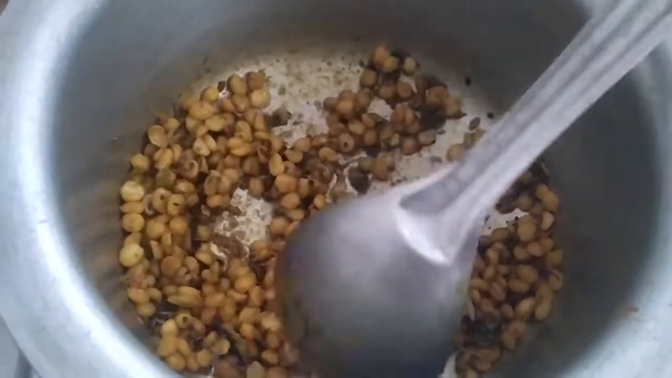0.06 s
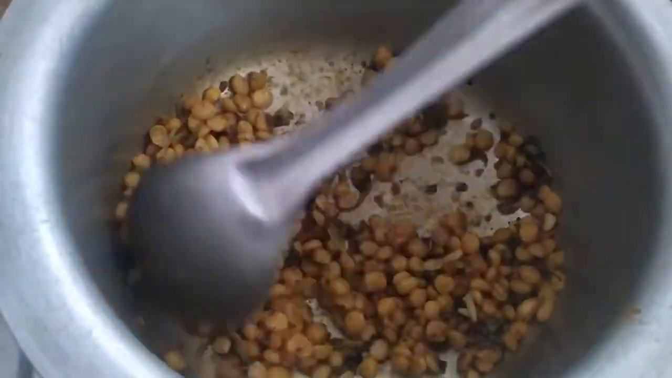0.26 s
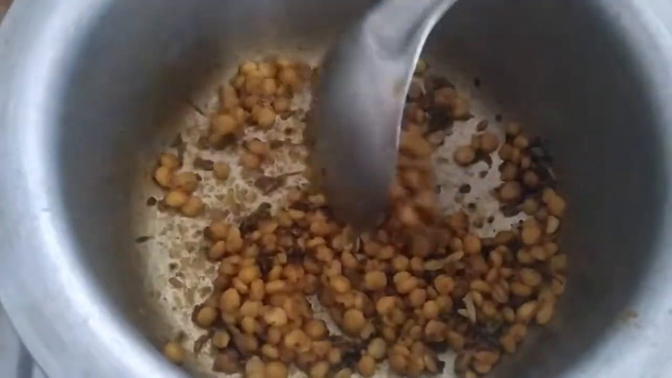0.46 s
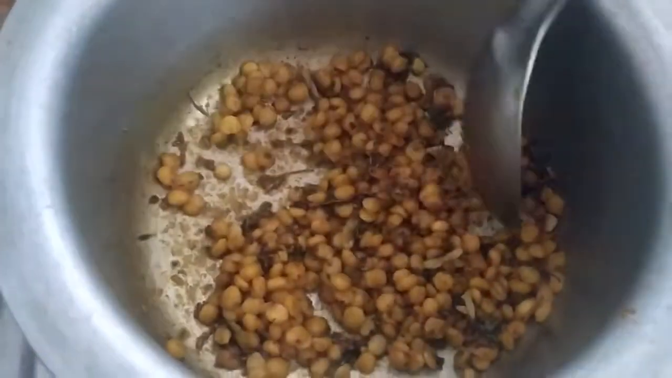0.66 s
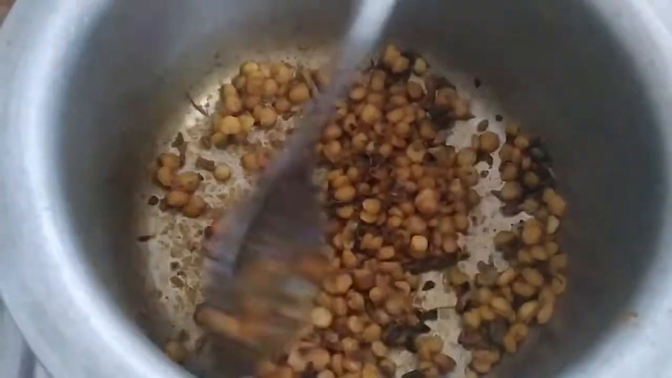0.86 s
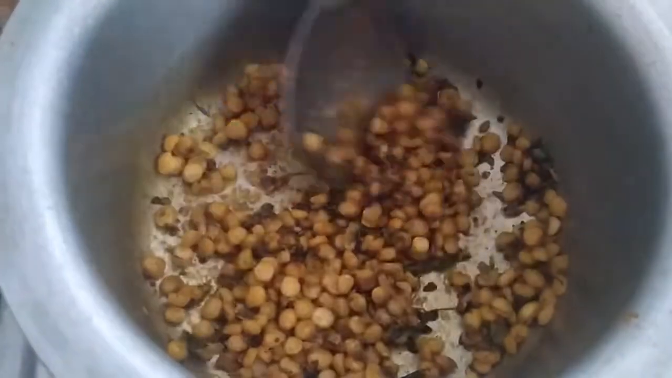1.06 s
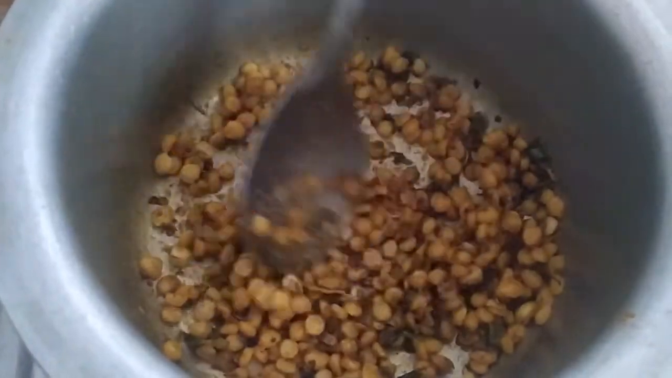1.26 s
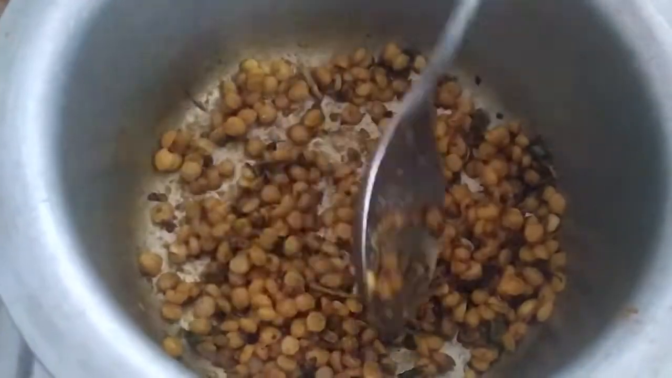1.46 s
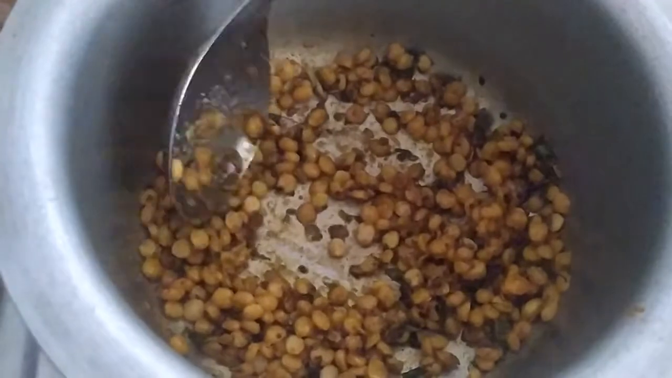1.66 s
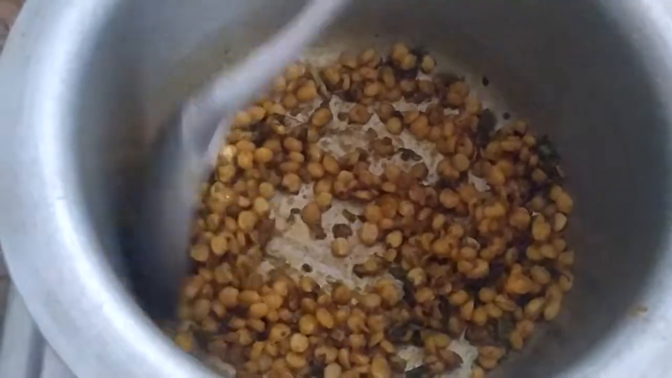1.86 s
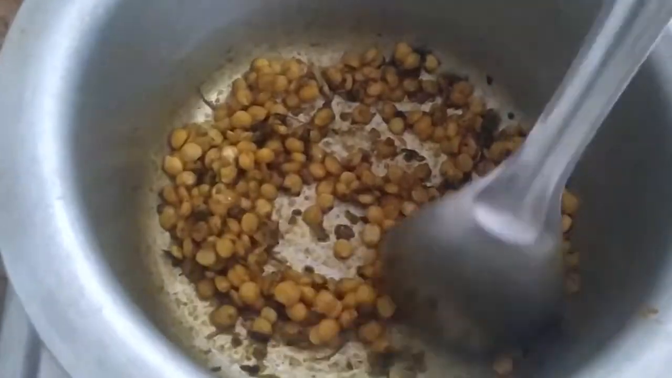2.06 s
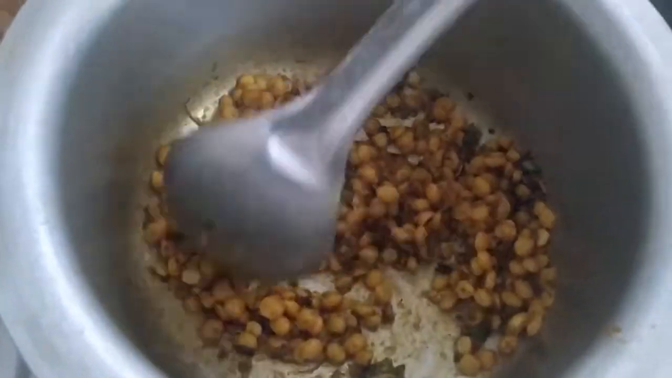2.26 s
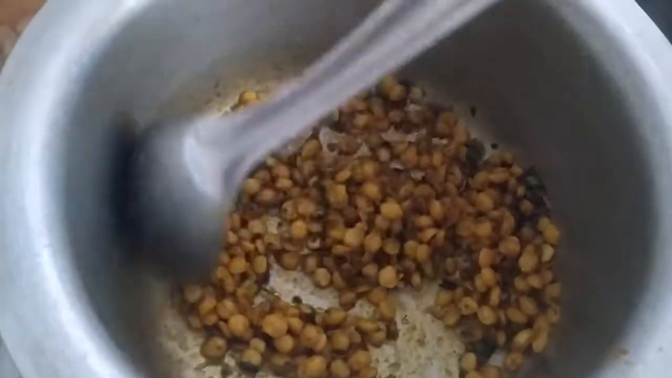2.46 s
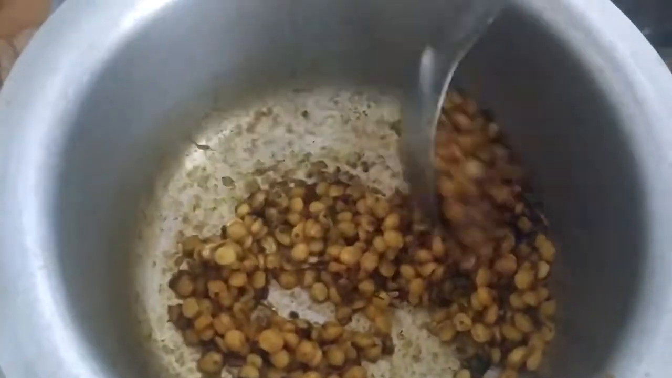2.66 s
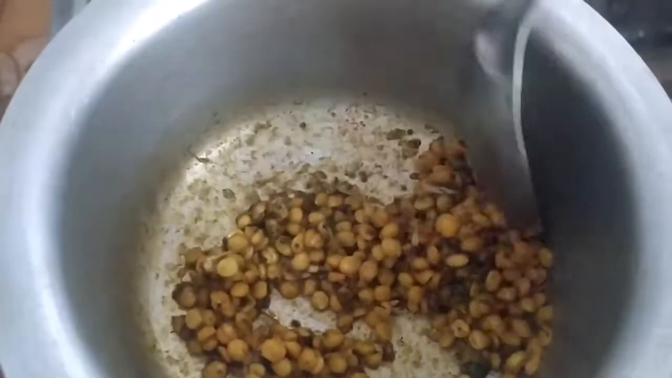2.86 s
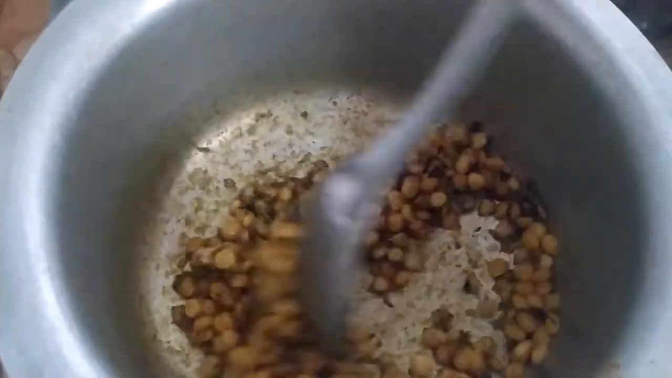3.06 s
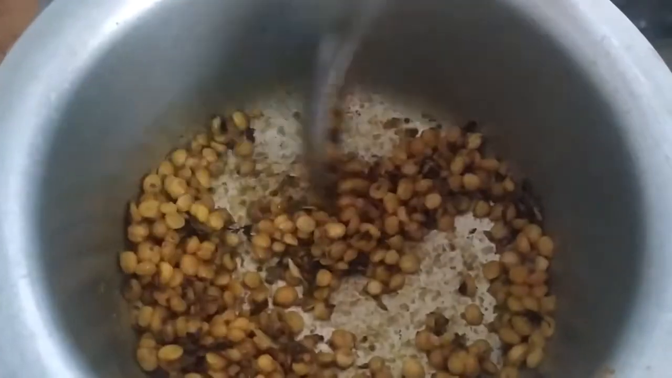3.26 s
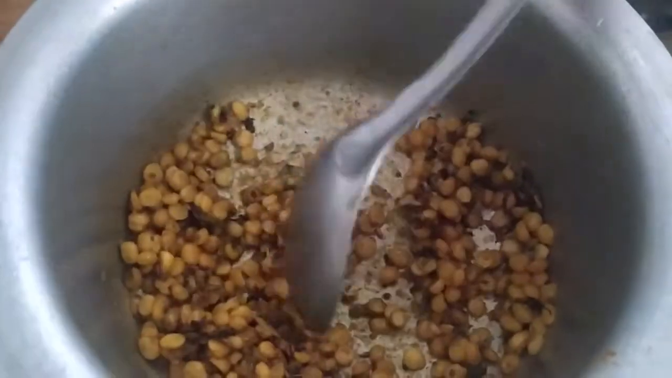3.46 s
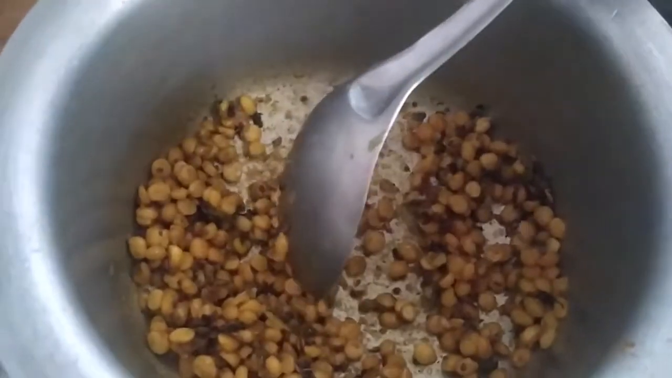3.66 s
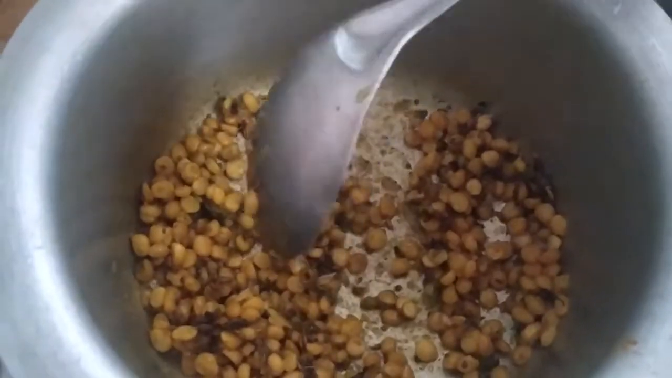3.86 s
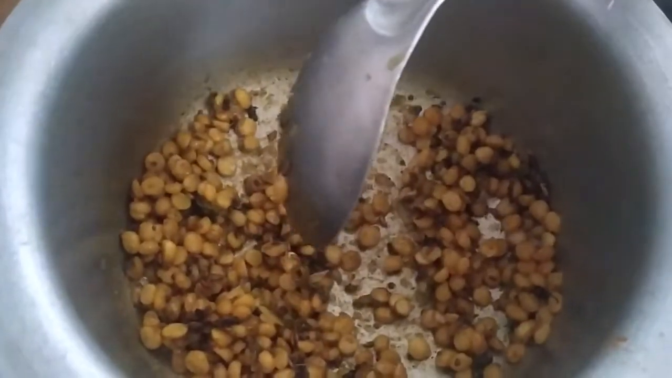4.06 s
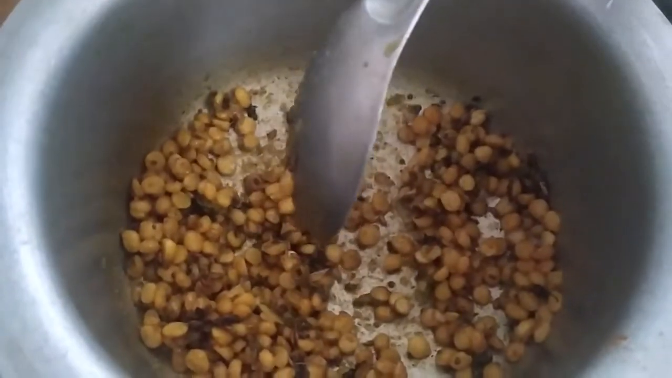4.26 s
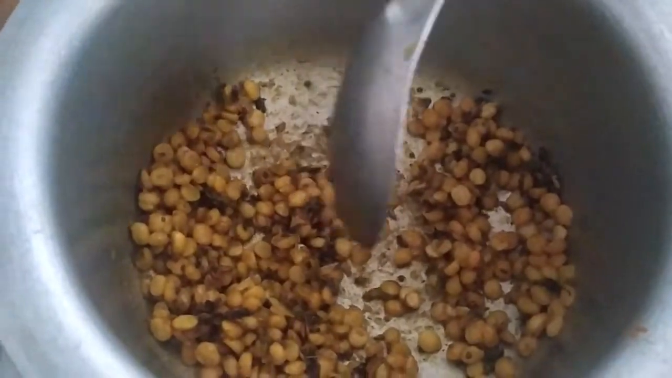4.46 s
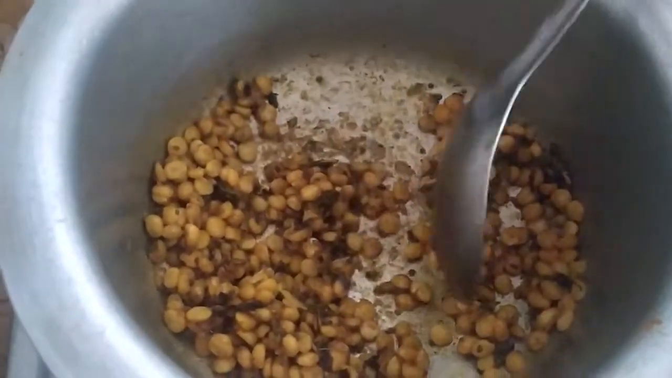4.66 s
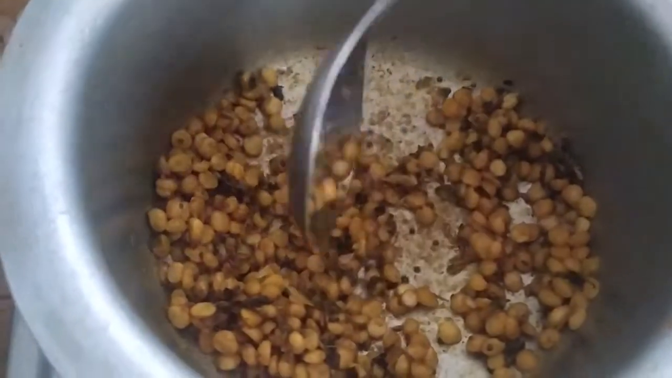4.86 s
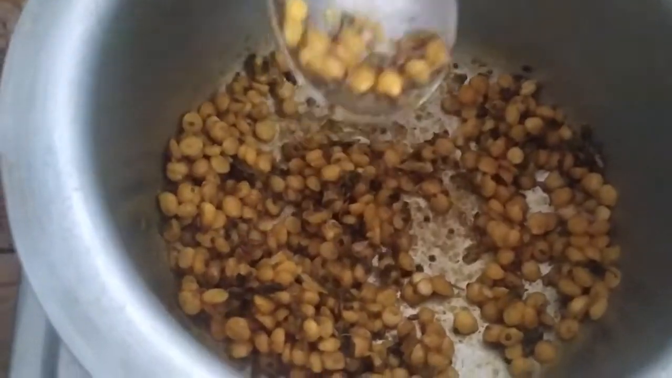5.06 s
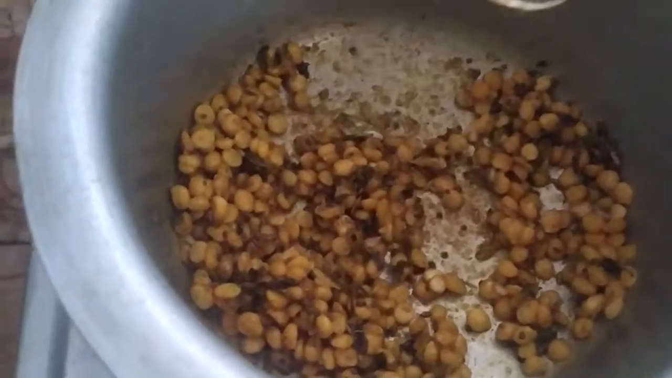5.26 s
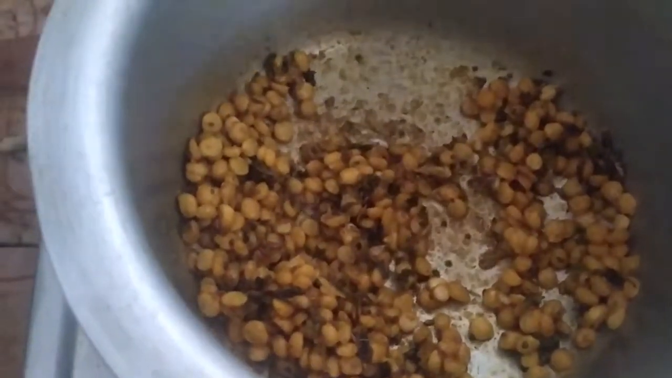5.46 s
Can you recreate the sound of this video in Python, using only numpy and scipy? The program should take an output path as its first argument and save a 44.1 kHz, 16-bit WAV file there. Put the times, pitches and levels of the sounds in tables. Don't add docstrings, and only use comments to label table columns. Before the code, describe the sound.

Close, crisp frying with sharp oil pops, rattling lentils, a ringing spoon clink near three seconds, then a slow smooth scoop scrape.

```python
import sys
import numpy as np
from scipy import signal
from scipy.fft import rfft, irfft
from scipy.io import wavfile
from scipy.ndimage import uniform_filter1d

SR = 44100
rng = np.random.default_rng(int(sys.argv[2]) if len(sys.argv) > 2 else 0)


def int16_out(signal):
    q = np.round(np.clip(np.atleast_2d(signal).T, -1, 1) * 32767)
    wavfile.write(sys.argv[1], SR, q.astype(np.int16))


def linear_from_db(decibels):
    return 10 ** (np.asarray(decibels, float) / 20)


N = 242991

# f/Hz, width/Hz, level/dB
FLOOR_BODY = [(178, 180, -17), (314, 137, -1.5), (425, 160, -3.5), (621, 155, -1.5), (779, 49, -7)]
# f/Hz, t60/s, twin offset/Hz, twin t60/s
WALL = [(736.3, 0.67, 4.5, 1.17), (1713.2, 0.54, -14.7, 0.66), (2207.4, 1.02, 14.8, 0.65),
        (2528.4, 0.91, 4.1, 1.53), (2934.2, 0.48, -11.2, 0.18), (1688.2, 0.2, 44.4, 0.34),
        (4135.6, 0.47, 50.6, 0.23), (4213.0, 0.1, -20.6, 0.13), (2216.3, 0.34, -11.6, 0.29),
        (4504.7, 0.23, 36.8, 0.18), (4918.7, 0.41, -42.3, 0.11), (5799.4, 0.3, 5.5, 0.53),
        (6161.8, 0.26, 53.9, 0.2), (6286.1, 0.26, -25.5, 0.35)]
# t/s, crack level/dB, further pairs' left lag/ms, spoon lifts after/s
CLINKS = [
    (.923, -15.5, .12, 0.0031),
    (2.856, -11.5, -0.08, 0.032),
]


def evened(x):
    return x / np.sqrt(np.mean(x ** 2) + 1e-20)


def curve(rows):
    s, db = np.transpose(rows)
    return np.interp(np.arange(N) / SR, s, db)


def strokes(rows, rise, fall, rest_db):
    t = np.arange(0, N / SR + .01, .001)
    s, hold, db = np.transpose(rows)[:, :, None]
    before, after = np.maximum(s - t, 0), np.maximum(t - s - hold, 0)
    level_db = db - rise * before - fall * after
    return np.interp(np.arange(N) / SR, t, np.maximum(level_db.max(axis=0), rest_db))


def add(mix, s, sound):
    part = mix[:, round(s * SR):][:, :sound.shape[1]]
    part += sound[:, :part.shape[1]]


def coloured(x, points):
    hz, db = np.transpose(points)
    log_f = np.log(np.fft.rfftfreq(N, 1 / SR) + 1)
    gain = linear_from_db(np.interp(log_f, np.log(hz), db))
    return evened(irfft(rfft(x) * gain, N))


def ring(x, hz, width):
    r = np.exp(-np.pi * width / SR)
    c = r * np.cos(2 * np.pi * hz / SR)
    return signal.lfilter([2 * (1 - r), -2 * (1 - r) * c], [1, -2 * c, r * r], x)


def body(x, peaks):
    total = 0
    for hz, width, db in peaks:
        once = ring(x, hz, 1.05 * width)
        total = total + linear_from_db(db) * ring(once, hz, 1.05 * width)
    return evened(total)


def partial(t, hz, t60, left_db, right_db, lag_ms):
    late = t - np.array([[lag_ms / 1000], [0]])
    return linear_from_db(np.array([[left_db], [right_db]]) - 60 * t / t60) * np.exp(2j * np.pi * hz * late)


def ports(per_s, spread_db, lag_ms, scatter_ms, diffuse, pitches):
    clicks = rng.choice([-1., 1.], (3, N)) * (rng.random((3, N)) < per_s / SR)
    clicks *= linear_from_db(spread_db * np.minimum(rng.exponential(1, (3, N)), 5))
    lag = (lag_ms + scatter_ms * rng.standard_normal(N)) * SR / 1000
    at_left = np.clip(np.arange(N) + np.rint(lag).astype(int), 0, N - 1)
    kind = rng.integers(0, len(pitches), (3, N))
    out = 0
    for k, (hz, width, db) in enumerate(pitches):
        some = clicks * (kind == k)
        direct = np.array([np.bincount(at_left, some[0], N), some[0]])
        both = np.sqrt(1 - diffuse) * direct + np.sqrt(diffuse) * some[1:]
        out = out + linear_from_db(db) * ring(both, hz, width)
    return evened(out)


def kitchen():
    # f/Hz, level/dB per Hz
    air_colour = [(15, -40), (40, 5), (65, -3), (105, 1), (175, 3), (230, -29), (560, 4), (1070, -13.5),
                  (1600, -21), (6000, -75)]
    # t/s, level/dB
    drone_db = [(0.0, -38), (0.11, -62), (0.38, -57), (0.5, -64.5), (0.98, -57), (1.3, -67), (1.75, -64),
                (1.86, -57), (2.15, -55), (2.33, -71), (2.44, -49), (2.9, -66), (3.25, -55.5), (3.61, -71),
                (3.93, -62), (4.36, -64), (4.96, -55.5), (5.51, -47)]
    # t/s, hold/s, level/dB
    murmurs = [(0, .01, -54), (.24, .14, -60), (.95, 0.028, -53.5), (1.55, .01, -58.5), (1.84, 0.32, -55.5),
               (2.42, 0.25, -59), (2.98, .01, -60), (3.18, 0.26, -54.5), (4.56, 0.017, -60),
               (4.84, 0.034, -51.5), (5.27, 0.021, -50.5)]
    noise = rng.standard_normal((3, 3, N))
    air, low, lump = (evened(n[0] + .38 * n[1:]) for n in noise)
    drone = body(low, [(70.7, 8.2, 11), (78.7, 54, -10.0)]) * linear_from_db(curve(drone_db))
    murmur = body(lump, [(166.8, 16.4, 2.5), (121.0, 113, -3.0)])
    murmur = murmur * linear_from_db(strokes(murmurs, rise=103, fall=116, rest_db=-68))
    return coloured(air, air_colour) * linear_from_db(-61.0) + drone + murmur


def scoop():
    # t/s, hold/s, level/dB
    pushes = [
        (4.38, .18, -50.5),
        (4.57, 0.17, -41),
        (4.76, 0.19, -41.5),
        (5.0, 0.2, -42.5),
        (5.2, 0.044, -40),
    ]
    # f/Hz, width/Hz, level/dB
    bare_floor = [(437, 166, -3), (716, 160, -9.5), (1040, 240, -7), (1640, 39, -18)]
    drag = ports(per_s=6000, spread_db=1, lag_ms=0.21, scatter_ms=0.074, diffuse=0.36,
                 pitches=[(990, 31000, 0)])
    hiss = body(drag, [(514, 330, -30), (1680, 2860, -3)])
    sound = body(drag, bare_floor) + linear_from_db(7.0) * hiss
    return evened(sound) * linear_from_db(strokes(pushes, rise=200, fall=92, rest_db=-96))


def spits():
    # t/s, peak level/dB, f/Hz, left-right/dB, t60/ms
    pops = [(0.171, -17, 7940, -12, 16), (0.5064, -16, 7350, -12, 16), (0.7115, -16.5, 3260, 10, 9.1),
            (0.9236, -12, 6700, -14, 16), (1.951, -19, 10500, 0.0, 16), (2.0193, -16, 6900, -5, 16),
            (2.126, -24, 3250, 2, 8.8), (2.411, -14, 6600, 0.5, 8), (2.415, -15, 4570, 0, 8),
            (2.539, -17, 4330, 2, 7), (2.584, -12, 4100, 2, 8), (2.766, -21, 5420, 4, 8),
            (2.8566, -3.5, 6070, -9, 19), (3.2385, -14, 9100, -7, 15), (3.264, -19, 3300, 2, 7.1),
            (3.276, -19, 3000, 0, 7.3), (3.332, -19, 2710, 6, 15), (3.54, -26, 3970, 1, 8),
            (3.9055, -20, 8100, -1.5, 10), (4.379, -20, 9700, 0.5, 16), (4.932, -24, 5820, 0, 8)]
    out, t = np.zeros((2, N)), np.arange(900) / SR
    for s, db, hz, pan_db, t60_ms in pops:
        pop = np.sin(2 * np.pi * hz * t) * linear_from_db(-60 * t / t60_ms * 1000)
        pop = pop + 0.12 * rng.standard_normal(900) * linear_from_db(-60 * t / 0.0045)
        left = np.roll(pop, 13) * linear_from_db(pan_db / 2)
        add(out, s, linear_from_db(db - 6) * np.array([left, pop * linear_from_db(-pan_db / 2)]))
    return out


def knocks():
    # t/s, peak level/dB, thud f/Hz, tick relative level/dB, wall hum relative level/dB
    hits = [(0.256, -20, 593, -11, -10), (0.365, -27, 595, -8, -8), (0.71, -19.5, 554, -10, -14.5),
            (1.51, -46, 576, -10, -23), (1.855, -37.5, 696, -1, 6), (1.95, -26, 640, -17, -3.5),
            (1.994, -30, 580, -18, 0), (2.123, -31.5, 584, -5, -20), (2.426, -8, 616, -10.5, -14.5),
            (2.536, -17.5, 617, -18, -41), (3.169, -25, 516, -13, -36), (3.331, -34.5, 477, -17, -30),
            (4.566, -36, 425, -21, -11)]
    out, t = np.zeros((2, N)), np.arange(SR // 3) / SR
    late = np.maximum(t - np.array([[.0016], [.0014]]), 0)
    hum_hz = WALL[0][0] + WALL[0][2]
    for s, db, hz, tick_db, wall_db in hits:
        push = (1 - np.exp(-(late / 0.00093) ** 2)) * np.exp(-late / 0.0031) * 1.27
        thud = -np.sin(2 * np.pi * hz * late) * push
        give = late / 0.0041 * np.exp(1 - late / 0.0024)
        thud = thud - 0.22 * np.sin(2 * np.pi * 0.436 * hz * late) * give
        jumps = rng.standard_normal((3, len(t)))
        tail = body(jumps[0] + .5 * jumps[1:], FLOOR_BODY)
        tail = tail * linear_from_db(-18.5 - 60 * t / 0.32) * (1 - np.exp(-late / 0.004))
        tick = ring(jumps[1:], 2300, 3200) * linear_from_db(tick_db - 60 * t / 0.13) * (late > 0)
        hum = np.sin(2 * np.pi * hum_hz * late) * linear_from_db(wall_db - 60 * t / 0.53)
        hum = hum * (1 - np.exp(-t / 0.11)) * linear_from_db([[2.5], [-2.5]])
        add(out, s, linear_from_db(db + 2.0) * (thud + tail + tick + hum))
    return out


def clang(t):
    draw = rng.random((40, 4, 2, 1))
    hz, t60 = 2600 * 3.7 ** draw[:, 0], 0.038 + 0.064 * draw[:, 1]
    level = linear_from_db(-12 * draw[:, 2] - 60 * t / t60)
    return (level * np.sin(2 * np.pi * (hz * t + draw[:, 3]))).sum(axis=0)


def wall_ring(which, lag_ms, lift_s, t):
    # left/dB, right/dB, twin left/dB, twin right/dB, first swell t/s
    first_clink = [(-39.2, -46.1, -30.4, -36.3, 0.1836), (-38.7, -25.6, -20.7, -20.2, 0.0171),
                   (-25.9, -35.1, -43.6, -33.4, 0.0113), (-37.1, -45.6, -46.3, -41.9, 0.0313),
                   (-51.8, -47.4, -34.7, -38.6, 0.0651), (-19.9, -28.4, -45.4, -41.8, 0.0105),
                   (-36.6, -40.3, -46.1, -45.3, 0.0019), (-43.4, -49.7, -35.9, -41.1, 0.0148),
                   (-26.5, -37.5, -21.8, -46.0, 0.0117), (-31.8, -49.3, -26.9, -37.5, 0.0206),
                   (-30.5, -44.0, -20.1, -26.2, 0.0183), (-27.0, -36.6, -40.1, -44.5, 0.0105),
                   (-31.7, -46.0, -46.9, -36.9, 0.0042), (-37.6, -51.6, -41.6, -38.0, 0.0054)]
    second_clink = [(-25.9, -25.3, -22.8, -28.1, 0.1647), (-15.5, -16.9, -22.3, -35.4, 0.0559),
                    (-26.0, -24.7, -24.3, -23.4, 0.0442), (-24.0, -28.8, -39.7, -44.4, 0.0551),
                    (-23.0, -35.9, -24.1, -33.9, 0.0642), (-22.2, -25.6, -27.5, -33.4, 0.0029),
                    (-26.0, -33.0, -21.0, -27.0, 0.0228), (-12.5, -20.0, -11.0, -21.0, 0.0235),
                    (-17.4, -35.4, -15.6, -21.3, 0.0422), (-24.0, -30.0, -27.0, -26.0, 0.0179),
                    (-21.0, -40.0, -23.0, -33.8, 0.036), (-31.2, -32.8, -29.4, -36.6, 0.0706),
                    (-35.5, -34.9, -26.6, -28.4, 0.0094), (-26.3, -30.5, -34.8, -41.7, 0.0155)]
    # left lag/ms, twin left lag/ms in clink one, the same two in clink two
    facing = [(0.265, -0.056, -0.053, -0.096), (0.137, 0.252, 0.02, 0.076), (-0.09, 0.127, -0.097, 0.094),
              (-0.041, 0.034, -0.079, -0.077), (0.046, -0.008, 0.049, 0.101),
              (0.247, -0.205, -0.214, -0.034), (0.005, 0.105, 0.075, 0.031), (0.036, 0.101, -0.043, -0.043),
              (0.034, -0.209, -0.212, 0.156), (0.11, 0.049, -0.004, -0.081), (0.078, 0.084, 0.012, 0.074),
              (0.028, 0.025, -0.026, 0.0), (0.029, 0.063, -0.05, -0.08), (-0.006, -0.055, 0.019, -0.041)]
    neighbours = {5: (1, .0371, .0375), 8: (2, .0878, .0498)}
    # f/Hz, t60/s, twin offset/Hz, level/dB in clink one, level/dB in clink two
    further_pairs = [(6720, 0.17, 52, -20.5, -18), (7860, 0.15, -19, -20.5, -29), (9100, .17, 21, -24, -39),
                     (3440, .5, -10, -36, -30), (4357, 0.3, -22, -42, -16.5), (8440, 0.08, 34, -35, -34),
                     (5250, 0.14, 40, -25, -31), (10000, 0.12, 49, -24, -17)]
    out = 0
    struck = (first_clink, second_clink)[which]
    for k, ((hz, t60, offset_hz, twin_t60), (*db, swell)) in enumerate(zip(WALL, struck)):
        main_ms, twin_ms = facing[k][2 * which:][:2]
        beat = np.exp(2j * np.pi * offset_hz * (t - swell))
        pair = partial(t, hz, t60, *db[:2], main_ms)
        pair = pair + beat * partial(t, hz, twin_t60, *db[2:], twin_ms)
        strong, *step_s = neighbours.get(k, (k, 0, 0))
        pair = pair * np.exp(-2j * np.pi * (hz - WALL[strong][0]) * step_s[which])
        pair = pair * linear_from_db(1.5 + 1.65 * (hz > 2400))
        held = np.array([[.8], [.45]]) * (hz < 2000) * np.exp(-(t / lift_s * (hz / 1713) ** .6) ** 4)
        muffle_s = .26 + .14 * (WALL[0][0] / hz) ** 2
        out = out + pair * (1 - held) * np.exp(-(t / muffle_s) ** 4)
    for hz, t60, offset_hz, *db in further_pairs:
        out = out + partial(t, hz, t60, db[which] - 4, db[which], lag_ms)
        out = out + partial(t, hz + offset_hz, t60, db[which] - 3, db[which] - 8, -lag_ms)
    return out.imag * (1 - np.exp(-t / 0.0012))


def clinks():
    # t/s, length/s, f/Hz, level/dB
    brushes = [
        (1.85, 0.055, 2510, -35.5),
        (1.887, 0.035, 1705, -35.5),
        (1.949, 0.079, 2212, -27),
        (1.959, 0.06, 1715, -40),
        (1.964, 0.2, 4370, -29.5),
        (2.437, 0.031, 2200, -29),
        (2.583, .06, 9100, -21),
    ]
    out, t = np.zeros((2, N)), np.arange(SR // 2) / SR
    soon = t[:SR // 5]
    steel = signal.butter(3, [1000 / SR * 2, 13000 / SR * 2], "bandpass")
    for which, (s, crack_db, lag_ms, lift_s) in enumerate(CLINKS):
        crack = evened(signal.lfilter(*steel, rng.standard_normal((2, len(t)))))
        fade = linear_from_db(-60 * t / 0.023) + 0.28 * linear_from_db(-60 * t / 0.25)
        crack *= linear_from_db(crack_db) * fade * (1 - np.exp(-t / 0.00079))
        add(out, s, linear_from_db(crack_db - 41) * clang(soon) * (1 - np.exp(-soon / 0.0011)))
        add(out, s, crack + wall_ring(which, lag_ms, lift_s, t))
    for s, length, hz, db in brushes:
        swell = t / length * np.exp(1 - 3.4 * t / length) * 2.13
        add(out, s, swell * partial(t, hz, 0.75, db, db - 8.5, 0.022).imag)
    return out


def scuffs(slips):
    # t/s, length/s, level/dB, f/Hz, width/Hz
    grinds = [(0.612, .04, -39.5, 1600, 1100), (.718, 0.069, -44, 3300, 900),
              (0.783, 0.061, -44, 4100, 800), (1.86, .03, -48, 4400, 500), (2.01, 0.049, -38, 4500, 600),
              (2.114, .05, -44, 2750, 700), (2.162, 0.013, -36.5, 2200, 2500),
              (2.416, .04, -32, 7500, 5000), (2.436, 0.059, -39, 2600, 1500),
              (2.568, 0.084, -38.5, 3300, 1600), (2.873, .06, -29, 4370, 400),
              (3.235, 0.05, -39.5, 3330, 1300), (3.332, .06, -48, 2800, 700),
              (3.334, 0.044, -43, 3680, 500)]
    out = np.zeros((2, N))
    for s, length, db, hz, width in grinds:
        grit = slips[:, round(s * SR):][:, :round(length * 1.5 * SR)]
        u = np.arange(grit.shape[1]) / SR / length
        grit = evened(ring(ring(grit, hz, width), hz, width))
        add(out, s, grit * linear_from_db(db) * np.minimum(u / 0.072, 1) * np.exp(-u ** 4))
    return out


def stir():
    # t/s, hold/s, pressure level/dB, steel rasp relative level/dB
    drags = [(0, 0.023, -46.5, -5), (0.126, 0.13, -52, -8), (0.266, 0.0043, -41.5, -1),
             (0.357, .005, -46, -14), (0.623, 0.014, -66, 15), (0.75, .01, -42.5, -2),
             (0.937, 0.012, -43, -13), (0.99, 0.082, -55, 6), (1.527, 0.038, -50, 0.5),
             (1.852, 0.1, -43.5, -5.5), (1.957, 0.025, -40, 1), (2.022, 0.13, -42.5, -6),
             (2.197, 0.13, -54.5, -14), (2.43, 0.12, -37.5, -1.5), (2.576, 0.044, -40, -7),
             (2.88, 0.0084, -50, 14.5), (2.933, 0.033, -55, 7), (3.17, 0.0046, -37, -10),
             (3.218, 0.13, -46, -8), (3.4, 0.17, -55.5, -2), (3.855, .005, -53, -1), (4.206, 0.1, -57.5, 8)]
    # t/s, hold/s, level/dB
    tumbles = [(0, 0.005, -29), (.28, .01, -36), (.37, 0.061, -36), (.62, 0.061, -35.5), (.71, 0.055, -36),
               (.93, .01, -49), (1.1, 0.17, -37), (1.4, .01, -39), (1.74, .01, -41), (1.83, 0.4, -38),
               (2.405, .02, -37), (2.44, .02, -26.5), (2.59, 0.022, -26.5), (2.9, .01, -26.5),
               (2.98, .03, -30.5), (3.25, 0.016, -30.5), (3.33, 0.063, -33), (3.64, .01, -51),
               (3.85, 0.68, -40)]
    slips = ports(per_s=1200, spread_db=3.0, lag_ms=0.27, scatter_ms=0.03, diffuse=0.27,
                  pitches=[(1530, 6300, 0)])
    press_db = strokes([row[:3] for row in drags], rise=1060, fall=166, rest_db=-63)
    rasp_rows = [(s - .01, hold, db + rel) for s, hold, db, rel in drags]
    rasp_db = strokes(rasp_rows, rise=1060, fall=166, rest_db=-56)
    rumble = body(slips, FLOOR_BODY) * linear_from_db(press_db - 2.0)
    rasp = body(slips, [(1530, 470, 13.0), (1930, 1960, -3.0)]) * linear_from_db(rasp_db - 1)

    shells = [(2647, 180, -1), (3640, 530, -3.5), (4400, 1300, -29.5), (7250, 2600, -4.5)]
    rattle = ports(per_s=1600, spread_db=1.5, lag_ms=0.25, scatter_ms=0.092, diffuse=1.0, pitches=shells)
    rattle *= linear_from_db(strokes(tumbles, rise=204, fall=150, rest_db=-44) - 4.5)

    since = np.arange(N) / SR - np.array([[row[0]] for row in CLINKS])
    near = 1 - ((since > -.08) & (since < .3)).sum(axis=0)
    feed = slips * linear_from_db(press_db) * near
    wall = sum(ring(feed, hz, 6.1) for hz, *_ in WALL[:5]) * linear_from_db(19.0)
    return rumble + rasp + rattle + wall + scuffs(slips)


def patchy(x, depth_db):
    z = signal.stft(x, nperseg=256)[2]
    islands = uniform_filter1d(rng.standard_normal(z.shape[1:]), size=3, axis=0)
    islands = evened(uniform_filter1d(islands, size=14, axis=1))
    return evened(signal.istft(z * linear_from_db(depth_db * islands), nperseg=256)[1][:, :N])


def sizzle():
    # t/s, level/dB
    frying_db = [(0.0, -36), (0.49, -33.5), (0.9, -33), (1.0, -30.5), (1.35, -33), (1.56, -31.5),
                 (1.67, -33), (1.93, -34), (1.96, -30.5), (2.39, -34.5), (2.52, -30.5), (2.73, -34),
                 (2.85, -33.5), (2.93, -31.5), (4.26, -37), (5.0, -38), (5.25, -37.5), (5.45, -38.5)]
    # f/Hz, level/dB per Hz
    fizz_colour = [(530, -22), (900, -14.5), (1100, -16.5), (1230, -21), (1420, -14.5), (3370, -7),
                   (3700, -6), (7880, 1.5), (11600, 0), (15800, -9.5)]
    # t/s, hold/s, level/dB
    flares = [
        (.77, 0.031, -33.5),
        (.93, .005, -27),
        (2.42, .02, -30),
        (2.585, 0.022, -30.5),
        (2.87, 0.0071, -24.5),
        (4.37, 0.017, -45.5),
    ]
    sizes = [(2500, 3000, 0), (5500, 4000, 0), (9000, 5000, 0), (13500, 6000, 0)]
    bursts = ports(per_s=7000, spread_db=2.0, lag_ms=.32, scatter_ms=.02, diffuse=0.069, pitches=sizes)
    t = np.arange(1500) / SR
    wash = rng.standard_normal((2, 1500)) * linear_from_db(-60 * t / 0.053) * linear_from_db(-7.0)
    wash[:, 0] = 1
    wash = irfft(np.exp(1j * np.angle(rfft(wash, 4096))))
    fizz = coloured(signal.oaconvolve(bursts, wash, axes=1)[:, :N], fizz_colour)
    flicker_db = 0.77 * evened(uniform_filter1d(rng.standard_normal(N), 900))
    flares_db = strokes(flares, rise=690, fall=210, rest_db=-90)
    level = np.hypot(linear_from_db(curve(frying_db)), linear_from_db(flares_db)) * linear_from_db(2.0 + flicker_db)
    return patchy(fizz, depth_db=1.34) * level * linear_from_db([[.2], [-.2]])


def scene():
    return kitchen() + scoop() + spits() + knocks() + clinks() + stir() + sizzle()


def low_pass(x):
    return signal.sosfilt(signal.butter(12, 16460, fs=SR, output="sos"), x)


def record(dry):
    thin = signal.lfilter(*signal.butter(2, 45 / SR * 2, "highpass"), dry)
    rounded = np.tanh(thin)
    edge = signal.firwin(601, 15850, window=("kaiser", 9), fs=SR)
    mix = signal.oaconvolve(rounded, edge[None], "same")
    return low_pass(mix)


dry = scene()
out = record(dry)
int16_out(out)
```